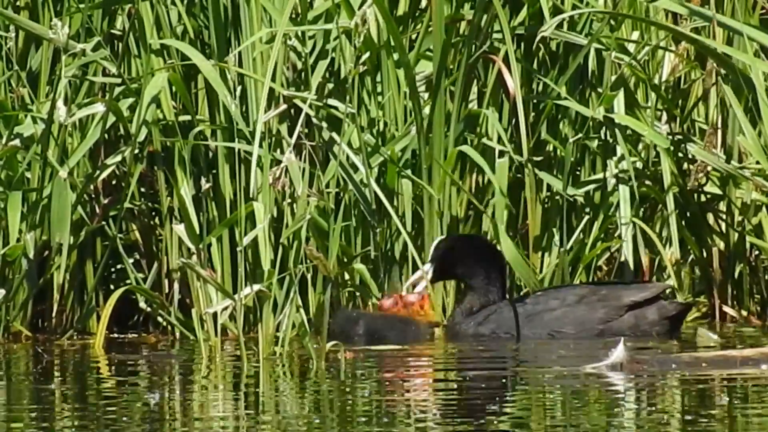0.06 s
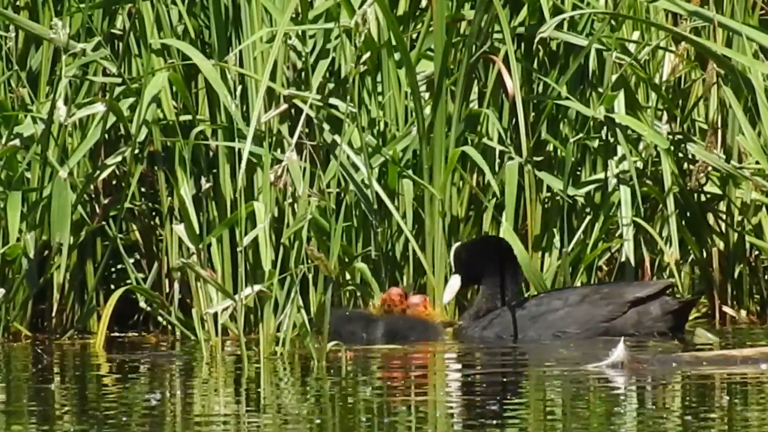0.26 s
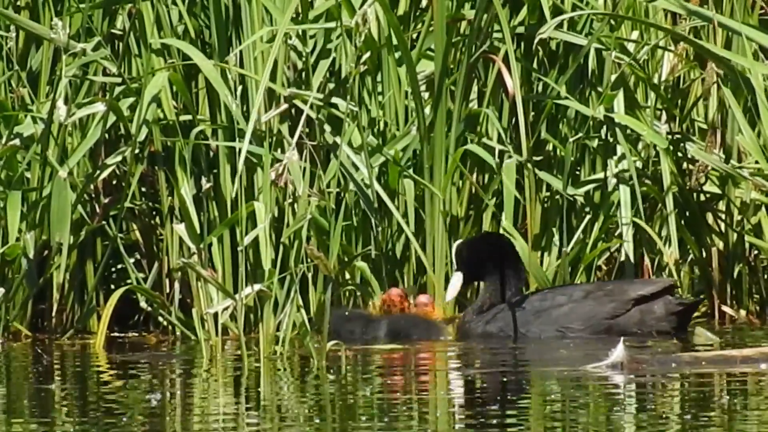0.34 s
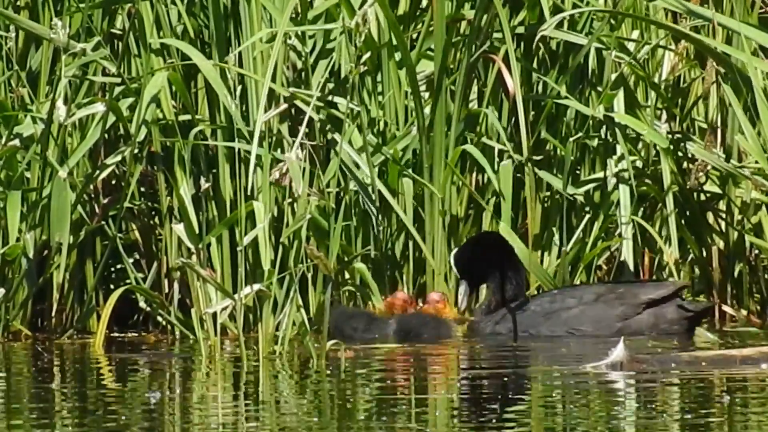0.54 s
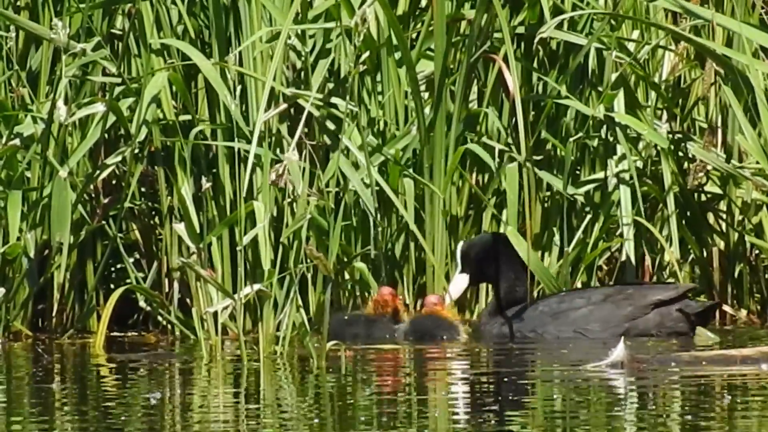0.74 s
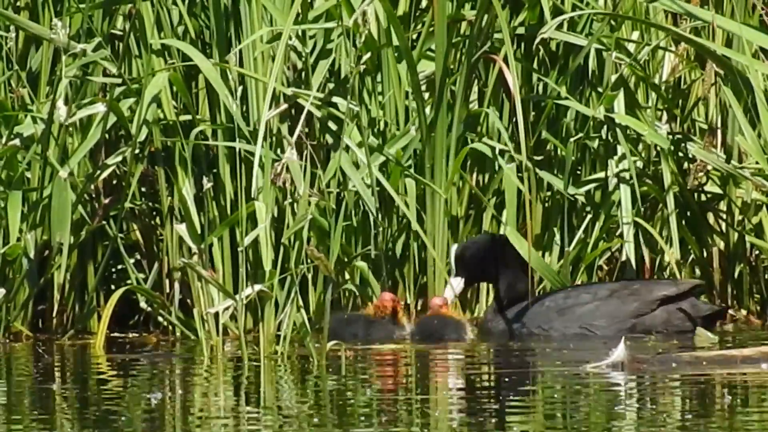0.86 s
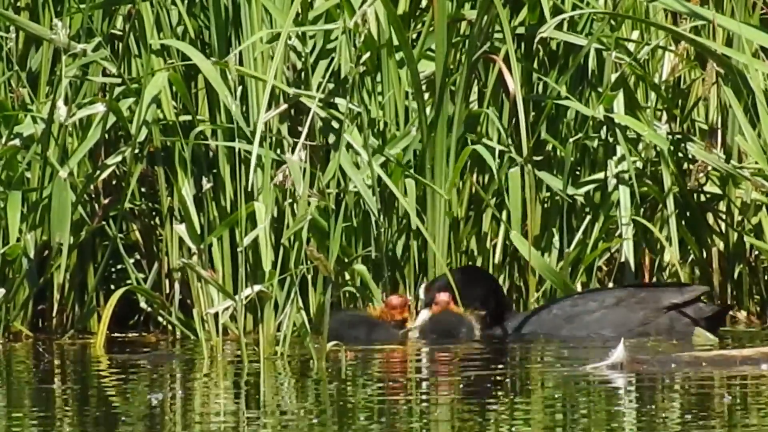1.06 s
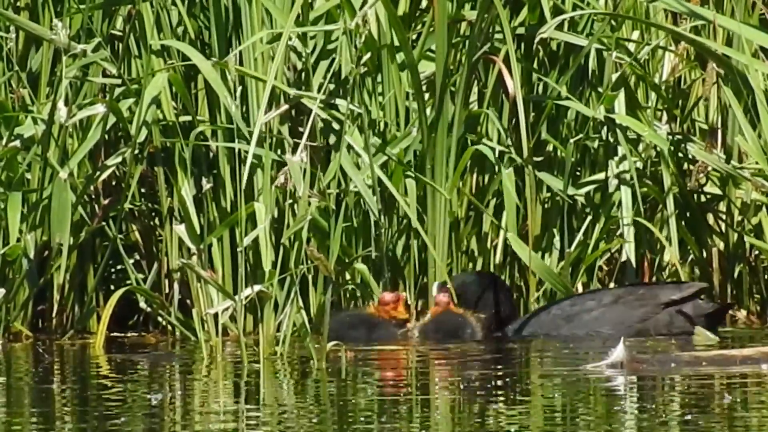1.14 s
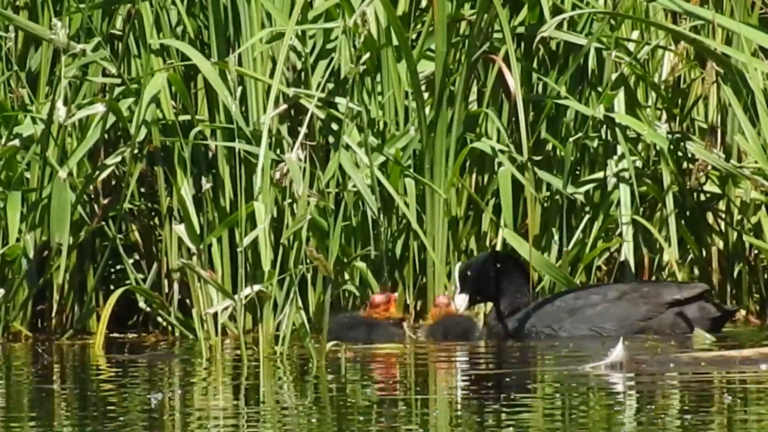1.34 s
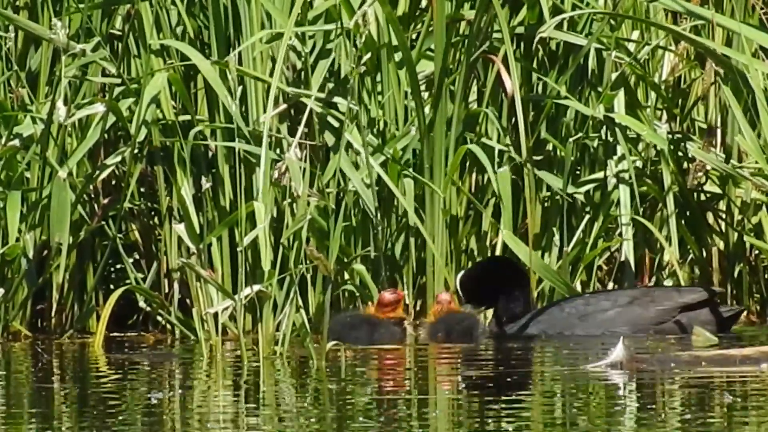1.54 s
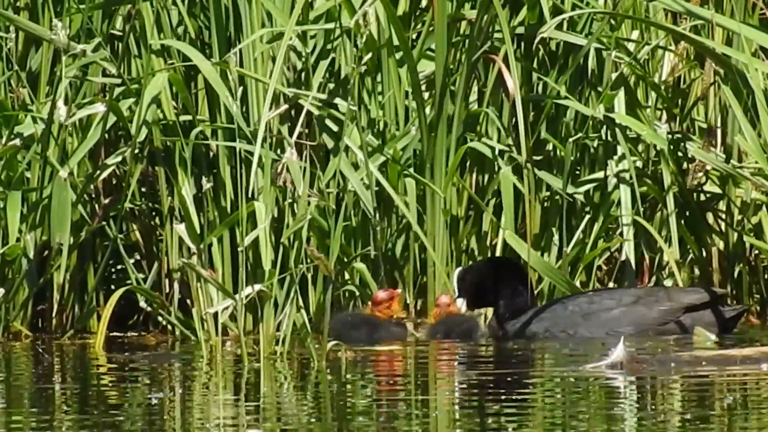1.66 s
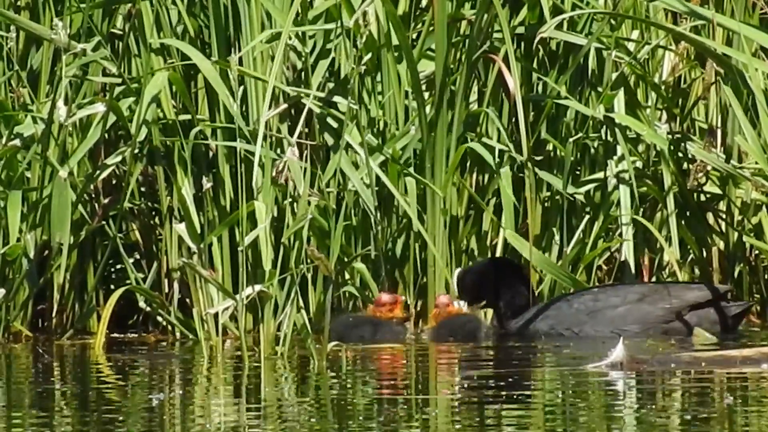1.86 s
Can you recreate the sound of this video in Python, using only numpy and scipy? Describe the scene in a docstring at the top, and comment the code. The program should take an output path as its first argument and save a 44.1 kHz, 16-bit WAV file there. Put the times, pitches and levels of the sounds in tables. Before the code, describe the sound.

Coot chicks beg at a reedy pond edge: a rapid trilled squeal swells and breaks into a rasp, then a short hoarse cry, then faint scattered chirps; outdoor stereo microphone at some distance, soft hiss and low rumble.

```python
"""A high whistle is heard first, over a low distant rumble and a soft hiss, both of filtered noise.
Coot chicks then beg at the edge of a reed bed: a trilled cry, a gliding tone with octave and upper voice,
breaks into a rasp of pulses through throat resonances; a hoarse second cry is a rasp with thin whistling
tones over it. Other birds whistle and chirp farther off; their notes and the thin tones are gliding sines.
The reeds scatter every call into many small echoes."""
import sys
import numpy as np
from scipy import signal
from scipy.fft import rfft, irfft
from scipy.io import wavfile
from scipy.ndimage import map_coordinates

SR = 44100
rng = np.random.default_rng(int(sys.argv[2]) if len(sys.argv) > 2 else 0)


def log_audio(samples):
    """Write samples as a 16-bit WAV file to the path given in sys.argv[1]."""
    # one column per channel
    frames = np.atleast_2d(samples).T
    # limit to full scale, then quantise
    limited = np.clip(frames, -1, 1)
    pcm = np.round(limited * 32767).astype(np.int16)
    wavfile.write(sys.argv[1], SR, pcm)


N = 83790  # length in samples

# Spectra of the distant rumble and the hiss: hz, relative_level_db
RUMBLE_SPECTRUM = [(38, -22), (54, 3), (68, -3.5), (100, -1), (130, -10), (168, -2), (215, -9), (280, -19),
                   (600, -17.5), (800, -25), (1500, -49)]
HISS_SPECTRUM = [(400, -40), (900, 2), (2300, -2.5), (4000, -3.5), (5300, -2.5), (6400, -3), (7600, -11),
                 (9500, -18), (15500, -27.5)]
# Stereo width of the hiss: hz, side_re_mid_db
HISS_WIDTH = [(500, 8), (1200, -12), (2500, -6.5), (5000, -3), (12000, 2)]
RUMBLE_DB, RUMBLE_SIDE_DB = -58, -16.5
HISS_DB, HISS_FLICKER_DB, HISS_FLICKER_HZ = -64, .4, 8.63

# Stereo width of the reed echoes: hz, side_gain_db
ECHO_WIDTH = [(2800, -6), (5000, 0)]
SCATTER_T60_S, TAIL_T60_S, TAIL_DB = 0.34, 0.94, -14
ECHOES_PER_S, FIRST_ECHO_S = 3000, .003

# Whistles and chirps of other birds, and the thin tones within the hoarse cry:
# start_s, length_s, start_hz, middle_hz, end_hz, start_db, end_db, warble_share (of pitch), echo_re_direct_db
GLIDING_NOTES = [ (-.02, .048, 6800, 6380, 6100, -52, -64, .025, 4),
                 (.063, .096, 6500, 6114, 5650, -65.5, -63.5, .038, 5),
                 (.111, .056, 2400, 2543, 2393, -67, -63, .2, 7),
                 (.465, .115, 2850, 2960, 2970, -62, -70, .02, -1),
                 (.578, .055, 1760, 1760, 1780, -62, -60, .012, -8),
                 (.62, .056, 3450, 3260, 3780, -57, -58, .018, -4),
                 (.622, .045, 4350, 4180, 4020, -60, -55, .016, -6),
                 (.795, .08, 3200, 3590, 3480, -68, -61, .022, -1),
                 (.877, .11, 3620, 3480, 3560, -61, -64, .024, -3),
                 (.967, .078, 2230, 2224, 2190, -63, -70, .004, -1),
                 (1.065, .088, 1730, 2020, 2700, -68, -63, .04, 1),
                 (1.125, .05, 2600, 2950, 3000, -72, -72, .09, 6),
                 (1.205, .05, 4050, 4280, 4200, -69, -73, .045, 2),
                 (1.297, .03, 4900, 5110, 5060, -65, -58, .009, 3),
                 (1.324, .038, 4700, 4300, 3200, -53, -61, .08, 4),
                 (1.368, .12, 7020, 6510, 5990, -56.5, -51.5, .008, -1),
                 (1.371, .1, 7660, 7300, 6850, -72, -67, .02, 2),
                 (1.46, .066, 3700, 2720, 2150, -54.5, -68, .045, 6),
                 (1.484, .04, 6000, 5850, 5650, -60, -62, .01, -1),
                 (1.575, .05, 2330, 2630, 3550, -61, -56.5, .045, 2),
                 (1.62, .055, 6380, 5980, 5750, -53.5, -61, .014, 0),
                 (1.624, .05, 4300, 4330, 4280, -63, -68, .025, 2),
                 (1.775, .11, 2120, 2270, 2075, -69, -75, .054, 3),
                 (1.795, .06, 6100, 6200, 6130, -69, -64, .025, 1)]
NOTE_ATTACK_S, NOTE_RELEASE_S, WARBLE_HZ, NOTE_PAN_DB = .004, .003, 380, 1.2

# Throat resonances of the rasp in the trilled cry: centre_hz, width_hz (one stage), relative_level_db
RASP_THROAT = [(1824, 530, -5.5), (2610, 2000, 3.5), (4210, 360, -5.5), (6030, 1390, 4.5)]
RASP_RATE_HZ, RASP_JITTER, RASP_AIR = 800, .3, 1.1  # jitter: spread of log rate; air: re pulses

# Hoarse cry, level of each resonance: time_s, first_db, second_db, third_db, fourth_db
HOARSE_LEVELS = [(.565, -85, -70, -64, -70), (.587, -65, -53, -51, -58), (.611, -60, -53.5, -45.5, -56),
                 (.631, -60, -55, -53, -52.5), (.665, -61, -56, -56, -55), (.693, -58, -59, -58, -54.5),
                 (.72, -61, -68, -68, -68), (.745, -75, -85, -76, -85)]
# Throat resonances of the hoarse cry: centre_hz, width_hz (one stage)
HOARSE_THROAT = [(2150, 1200), (3050, 1500), (4900, 1500), (6370, 750)]
HOARSE_PAN_DB, HOARSE_ECHO_DB = .5, -4

# Course of the trilled cry: time_s, pitch_hz, flick_share (of pitch, negative is down),
# tone_db, octave_db, upper_voice_db, rasp_db
TRILLED_COURSE = [(.222, 2667, -.1, -66, -69, -57, -72), (.228, 2703, -0.247, -56.5, -64, -62, -56.5),
                  (.24, 2674, -0.371, -51.5, -69, -55.5, -60),
                  (0.249, 2756, -0.3606, -48.5, -76, -58, -56.5), (.267, 2760, -.2, -50.5, -82, -59, -60),
                  (.274, 2690, .08, -46, -65, -60.5, -61), (.311, 2701, .14, -46, -59.5, -49, -63),
                  (0.347, 2721, .23, -43.5, -51, -56.5, -61), (.366, 2726, .26, -41, -46.5, -64, -56),
                  (0.386, 2791, .175, -45.5, -43.5, -78, -52.5), (.397, 2661, .09, -43, -51, -75, -40.5),
                  (.411, 2570, .1, -54, -55, -57, -38.5), (.418, 2560, .06, -66, -48, -65, -42.5),
                  (0.446, 2420, 0.068, -54, -52, -83, -59.5)]
# Resonance that shapes the octave: centre_hz, width_hz (one stage)
OCTAVE_RESONANCE = (6300, 3600)
# Treble roll-off of the cries: hz, gain_db
CRY_ROLL_OFF = [(8000, 0), (10000, -9)]
TRILL_HZ, TRILL_AT_S, TRILL_SWING_DB = 81.5, .2490, 5  # swing: up and down from the middle
FLICK_LAG_CYCLES, FLICK_SHARPNESS = .3, 2
FLICK_DIP_DB = -9  # per unit share of pitch bend
CRY_JITTER = 0.0275  # share of pitch
OCTAVE_ROUGH_RAD, OCTAVE_BUZZ_HZ = 1, 2203
UPPER_HZ, UPPER_JITTER = 4830, 0.052  # jitter: share of pitch
CRY_PAN_DB, CRY_ECHO_DB = 2.5, -4

MIC_LAG_S = .00002
TOP_HZ = 15700

SIDES = np.array([[1], [-1]])  # sign of the side signal at left and right


def undb(db):
    """Logarithmic level: decibels to amplitude gain."""
    return 10 ** (np.asarray(db) / 20)


def unit(x):
    """Normalisation of power: scale to rms 1."""
    return x / np.sqrt(np.mean(x ** 2))


def colour(x, points):
    """Linear filtering: weight the spectrum by (hz, gain_db) points joined on a log frequency axis."""
    hz, db = np.array(points, float).T
    f = np.arange(N // 2 + 1) * SR / N
    gain_db = np.interp(np.log(f + 1), np.log(hz), db)
    return irfft(rfft(x) * undb(gain_db), N)


def walk(rate):
    """Band-limited fluctuation: a cubic curve through `rate` random points per second, rms 1."""
    positions = np.arange(N) * rate / SR
    return unit(map_coordinates(rng.standard_normal(N), [positions], order=3, mode="wrap"))


def swell(times, db):
    """Amplitude envelope: gain along a level curve, practically silent outside it."""
    return undb(np.interp(np.arange(N) / SR, times, db, left=-150, right=-150))


def resonate(x, hz, width):
    """Resonance: two equal second-order peaks in cascade give steep flanks; output rms 1."""
    b, a = signal.iirpeak(hz, hz / width, fs=SR)
    once = signal.lfilter(b, a, x)
    return unit(signal.lfilter(b, a, once))


def place(x, pan_db):
    """Interaural level difference: a positive pan_db makes the left louder than the right."""
    return x * undb(SIDES * pan_db / 2)


def background():
    """Broadband noise: a distant rumble, nearly the same on both sides, under a wide soft hiss."""
    low, low_side, high, high_side = rng.standard_normal((4, N))
    rumble_mid = unit(colour(low, RUMBLE_SPECTRUM))
    rumble_side = undb(RUMBLE_SIDE_DB) * unit(colour(low_side, RUMBLE_SPECTRUM))
    hiss_mid = unit(colour(high, HISS_SPECTRUM))
    hiss_side = colour(unit(colour(high_side, HISS_SPECTRUM)), HISS_WIDTH)
    rumble = undb(RUMBLE_DB) * (rumble_mid + SIDES * rumble_side)
    hiss_gain = undb(HISS_DB + HISS_FLICKER_DB * walk(HISS_FLICKER_HZ))
    return rumble + hiss_gain * (hiss_mid + SIDES * hiss_side)


def reeds(x):
    """Multiple scattering: many small echoes from the stems, then a fainter tail from the banks."""
    t = np.arange(N) / SR
    scatter = undb(-60 * t / SCATTER_T60_S)
    tail = undb(TAIL_DB - 60 * t / TAIL_T60_S)
    decay = (scatter + tail) * (t > FIRST_ECHO_S)
    strengths = rng.standard_normal((2, N))
    arrivals = rng.random((2, N)) < ECHOES_PER_S / SR
    mid, side = strengths * arrivals * decay
    echoes = mid + colour(side, ECHO_WIDTH) * SIDES
    response = unit(echoes) / np.sqrt(N)  # total energy 1, averaged over both sides
    return signal.fftconvolve(x[None], response, axes=1)[:, :N]


def gliding_notes():
    """Frequency modulation: sines glide along a parabolic arc with a random warble."""
    t = np.arange(N) / SR
    direct, send = 0, 0
    for start, length, first, middle, last, start_db, end_db, warble, echo_db in GLIDING_NOTES:
        u = np.clip((t - start) / length, 0, 1)  # progress through the note
        arc = np.polyval(np.polyfit([0, .5, 1], [first, middle, last], 2), u)
        hz = arc * (1 + warble * walk(WARBLE_HZ))
        attack = np.clip((t - start) / NOTE_ATTACK_S, 0, 1)
        release = np.clip((start + length - t) / NOTE_RELEASE_S, 0, 1)
        level_db = start_db + (end_db - start_db) * u + 2 * walk(WARBLE_HZ)
        gain = attack * release * undb(level_db)
        note = np.sqrt(2) * gain * np.sin(2 * np.pi * np.cumsum(hz) / SR)
        direct = direct + note
        send = send + undb(echo_db) * note
    return place(direct + reeds(send), NOTE_PAN_DB)


def rasp():
    """Aperiodic excitation: irregular throat pulses, each with a decaying puff of air noise."""
    rate = RASP_RATE_HZ * np.exp(RASP_JITTER * walk(RASP_RATE_HZ))
    cycles = np.cumsum(rate) / SR
    pulses = np.diff(np.floor(cycles), prepend=0) * undb(2 * walk(300))
    puffs = np.exp(-(cycles % 1) / .5) * rng.standard_normal(N)
    return unit(pulses) + RASP_AIR * unit(puffs)


def hoarse_cry():
    """Source and filter: rasping pulses through four throat resonances, each with its own swelling level."""
    times, *levels = np.array(HOARSE_LEVELS).T
    source = rasp()
    cry = 0
    for level_db, (hz, width) in zip(levels, HOARSE_THROAT):
        cry = cry + swell(times, level_db) * resonate(source, hz, width)
    return place(cry + undb(HOARSE_ECHO_DB) * reeds(cry), HOARSE_PAN_DB)


def trilled_cry():
    """Joint pitch and level modulation: trill beats flick down, then up; the octave grows until a rasp."""
    t = np.arange(N) / SR
    times, hz, flick, tone_db, octave_db, upper_db, rasp_db = np.array(TRILLED_COURSE).T
    beat = 2 * np.pi * TRILL_HZ * (t - TRILL_AT_S) + 0.056 * walk(40.4)

    # the pitch bends once per beat, in a brief flick soon after the beat's loudest moment
    flick_phase = beat - 2 * np.pi * FLICK_LAG_CYCLES
    flick_shape = np.exp(FLICK_SHARPNESS * (np.cos(flick_phase) - 1))
    bend = 1 + np.interp(t, times, flick) * flick_shape + CRY_JITTER * walk(700)
    phase = 2 * np.pi * np.cumsum(np.interp(t, times, hz) * bend) / SR
    throb_db = TRILL_SWING_DB * np.cos(beat) + FLICK_DIP_DB * abs(bend - 1) + 2 * walk(500)
    throb = unit(undb(throb_db))
    tone = swell(times, tone_db) * np.sqrt(2) * np.sin(phase) * throb

    # the octave is roughened in phase and throbs half as deeply in dB
    rough_octave = np.sin(2 * phase + OCTAVE_ROUGH_RAD * walk(OCTAVE_BUZZ_HZ)) * np.sqrt(throb)
    octave = swell(times, octave_db) * resonate(rough_octave, *OCTAVE_RESONANCE)

    # the upper voice is loudest between the beats
    upper_phase = 2 * np.pi * np.cumsum(UPPER_HZ * (1 + UPPER_JITTER * walk(900))) / SR
    upper_throb = unit(undb(-TRILL_SWING_DB * np.cos(beat)))
    upper = swell(times, upper_db) * np.sqrt(2) * np.sin(upper_phase) * upper_throb

    source = rasp()
    harsh = 0
    for centre, width, level_db in RASP_THROAT:
        harsh = harsh + undb(level_db) * resonate(source, centre, width)
    cry = tone + octave + upper + swell(times, rasp_db) * unit(harsh)
    return place(cry + undb(CRY_ECHO_DB) * reeds(cry), CRY_PAN_DB)


def scene():
    """Superposition and interaural delay: trill and rasp reach the right microphone slightly late."""
    left, right = colour(trilled_cry() + hoarse_cry(), CRY_ROLL_OFF)
    f = np.arange(N // 2 + 1) * SR / N
    delay = np.exp(-2j * np.pi * f * MIC_LAG_S)
    cries = np.array([left, irfft(rfft(right) * delay, N)])
    return background() + gliding_notes() + cries


def record(dry):
    """Band limiting: the recorder cuts the top with a steep elliptic low-pass."""
    low_pass = signal.ellip(10, .1, 70, TOP_HZ, fs=SR, output="sos")
    return signal.sosfilt(low_pass, dry)


dry = scene()
out = record(dry)
log_audio(out)
```